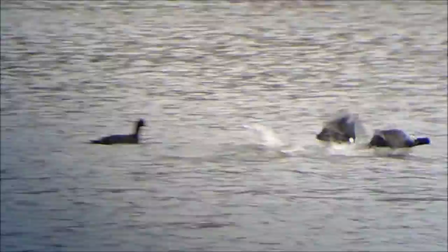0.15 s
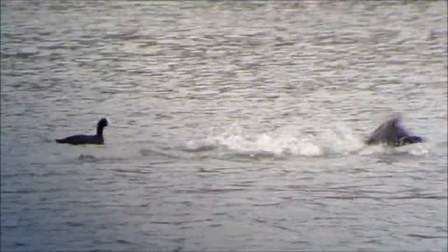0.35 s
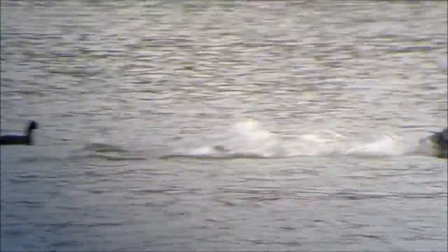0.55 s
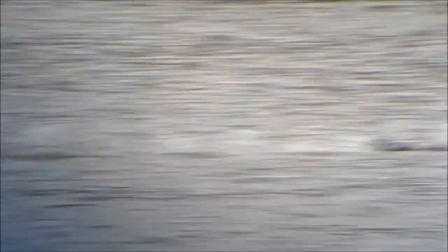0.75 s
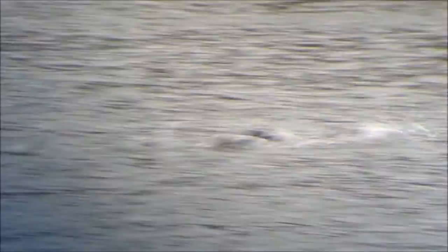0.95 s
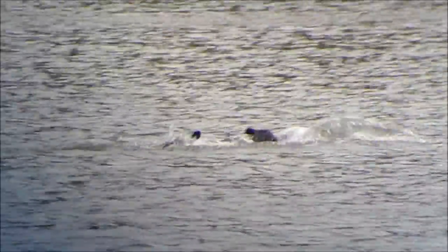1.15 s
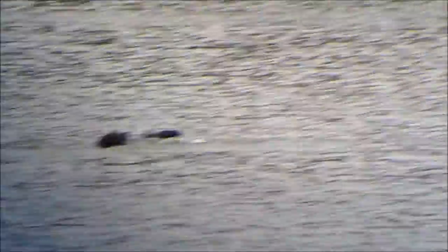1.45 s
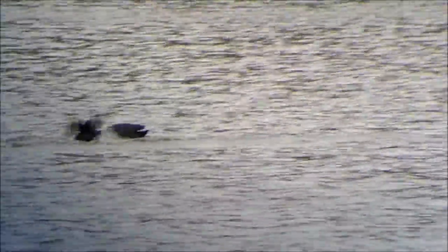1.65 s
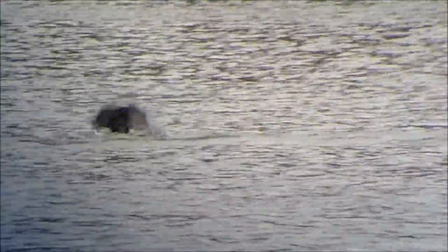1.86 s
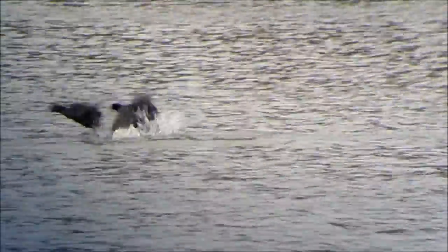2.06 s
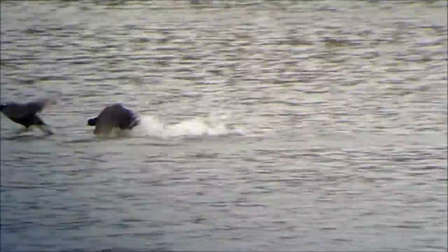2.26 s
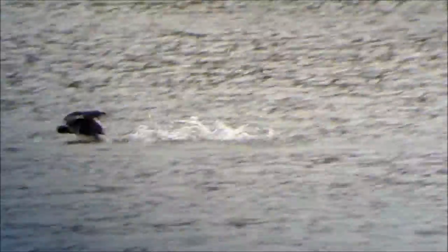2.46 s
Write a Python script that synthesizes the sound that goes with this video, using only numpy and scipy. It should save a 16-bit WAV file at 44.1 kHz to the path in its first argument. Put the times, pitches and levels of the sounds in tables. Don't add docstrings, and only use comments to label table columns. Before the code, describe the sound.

Short nasal coot squawks carry from far out on a wide reservoir, with one thin small-bird chirp, followed by soft foot slaps and faint splashing; low wind rumble, water wash and light camera hiss throughout.

```python
import sys
import numpy as np
from scipy import signal
from scipy.io import wavfile
from scipy.ndimage import uniform_filter1d

SR = 44100
rng = np.random.default_rng(int(sys.argv[2]) if len(sys.argv) > 2 else 0)


def voltage_ratio(level):
    return 10 ** (np.asarray(level, float) / 20)


def unload_audio(sound):
    columns = np.transpose(np.atleast_2d(sound))
    steps = np.round(np.clip(columns, -1, 1) * 32767)
    wavfile.write(sys.argv[1], SR, steps.astype(np.int16))


N = 115101

# (start [s], length [s], first pitch [Hz], last pitch [Hz], level [dB])
MELLOW_CALLS = [
    (.264, .096, 1062, 897, -44),
    (1.206, .05, 1078, 1030, -43),
]
CLEAR_CALLS = [
    (.852, .052, 895, 826, -37),
    (1.163, .054, 900, 770, -41),
    (2.33, .068, 930, 825, -45),
]
HARSH_CALLS = [
    (.263, .009, 1190, 1185, -36),
    (.272, .076, 1172, 1105, -31.5),
]
HOARSE_CALLS = [
    (.316, .032, 1035, 1032, -50),
    (.362, .04, 1042, 1034, -52),
    (1.225, .07, 1035, 1065, -52),
    (2.286, .075, 1075, 1030, -45),
]
# (start [s], length [s], first pitch [Hz], last pitch [Hz], level [dB])
YIPS = [
    (.248, .009, 995, 1010, -41),
    (.257, .012, 985, 1130, -43),
    (.832, .008, 1090, 1050, -44),
    (.841, .012, 925, 1025, -38),
]

# (frequency [Hz], level [dB])
MELLOW_THROAT = [(900, -.5), (1060, 0), (1800, -1), (2100, -2), (2750, -15), (3000, -3), (3200, -2),
                 (3800, -28)]
CLEAR_THROAT = [(850, -9), (1600, -.5), (1800, -.3), (2350, -1), (2650, -4), (3200, -11), (3550, -13),
                (4200, -30)]
HARSH_THROAT = [(1075, -1), (1150, -14), (2080, -4), (2200, -6), (2340, -.3), (3500, -.4), (4200, -32),
                (4700, -27)]
YIP_THROAT = [(1000, -10), (2000, -.1), (2300, -.3), (2950, -11), (3400, -12), (3800, -14), (4050, -26),
              (4800, -32)]

MELLOW_VOICE = dict(rise_s=.007, fade_db=-3, dull_db=-4, bend=2.7, hold=2, rough=.12, flutter_db=2.5)
CLEAR_VOICE = dict(rise_s=.004, fade_db=-8, dull_db=-7, bend=1.1, hold=1, rough=.1, flutter_db=1.5)
HARSH_VOICE = dict(rise_s=.004, fade_db=-25, dull_db=2, bend=2.5, hold=1, rough=.33, flutter_db=2)
YIP_VOICE = dict(rise_s=.002, fade_db=0, dull_db=0, bend=.5, hold=1, rough=.1, flutter_db=1)
HOARSE_VOICE = dict(rise_s=.007, fade_db=-4, dull_db=0, bend=3.5, hold=1, rough=.33, flutter_db=1.5)
FLUTTER_HZ, BREATH_HZ = 160, 130

# (start [s], length [s], first pitch [Hz], last pitch [Hz], level [dB])
CHIRP = [
    (1.016, .05, 3150, 4080, -59),
]
# (time [s], pitch [Hz], length [s], peak level [dB])
PLOPS = [(1.615, 2000, .014, -52), (1.668, 1620, .03, -47), (1.70, 1550, .016, -48),
         (1.795, 1340, .04, -47), (1.89, 1550, .008, -42), (1.891, 3550, .006, -49),
         (1.94, 1000, .014, -44), (2.088, 1560, .03, -46), (2.135, 2600, .014, -46),
         (2.143, 1550, .02, -49), (2.178, 3500, .008, -55), (2.498, 1150, .016, -47),
         (2.538, 560, .018, -40)]
# (middle [s], length [s], level [dB])
SPLASHES = [
    (0.833, 0.077, -46.5),
    (1.616, 0.36, -58),
    (1.93, 0.073, -61),
    (2.163, 0.093, -62),
    (2.545, 0.32, -54.5),
    (2.345, 0.14, -63.5),
]
# (frequency [Hz], level [dB])
SPRAY = [(600, -18), (1100, -3), (1600, 0), (2500, -7), (3200, -10), (3800, -20), (4500, -32)]
SPRAY_BUBBLES_PER_S = 2500

# (frequency [Hz], level per Hz [dB])
AIR = [(18, -39.5), (50, -12), (95, -5), (120, -1.5), (200, -3.5), (320, -7.5), (600, -9.5), (1600, -45.5)]
WATER = [(400, -13), (850, 2.5), (1300, -1), (2000, -5), (2800, -8), (3350, -9.5), (3800, -16.5),
         (4600, -53.5)]
HISS = [(2500, -16), (3900, 6), (5000, 4), (7000, 4.3), (7450, 5), (7800, -11.5), (8150, -37.5),
        (8400, -55)]
AIR_DB, WATER_DB, HISS_DB = -44.5, -51, -67
# (frequency [Hz], level [dB])
WHINE = [(4388, -85.5), (6223, -89.5)]
SHORE_T60_S, SHORE_DB = .2, -13
MICROPHONE_OFFSET = .0015


def evened(x):
    return x / np.sqrt(np.mean(x ** 2) + 1e-20)


def read(points, hz):
    f, value = np.transpose(points)
    return np.interp(np.log(hz + 1), np.log(f + 1), value)


def add(mix, s, sound):
    part = mix[round(s * SR):][:len(sound)]
    part += sound[:len(part)]


def drift(rate_hz, count):
    t = np.arange(count) / SR
    hz = np.geomspace(rate_hz / 8, rate_hz, 12)[:, None]
    phase = rng.random((12, 1))
    return np.sin(2 * np.pi * (hz * t + phase)).sum(0) / np.sqrt(6)


def call(row, throat, rise_s, fade_db, dull_db, bend, hold, rough, flutter_db):
    start, length, first_hz, last_hz, level_db = row
    t = np.arange(5000) / SR
    u = np.minimum(t / length, 1)
    glide = (1 - np.exp(-(bend * u) ** hold)) / (1 - np.exp(-bend ** hold))
    turns = np.cumsum(first_hz + (last_hz - first_hz) * glide) / SR
    hz = first_hz + (last_hz - first_hz) * glide
    out = np.zeros(len(t))
    for k in range(1, 5):
        smear = drift(BREATH_HZ * k, len(t)) + 1j * drift(BREATH_HZ * k, len(t))
        overtone = ((1 - rough + rough * smear) * np.exp(2j * np.pi * k * turns)).real
        dulling = dull_db * max(k - 2, 0) * 2 * np.sqrt(u)
        flutter = flutter_db * drift(FLUTTER_HZ, len(t))
        out += voltage_ratio(read(throat, k * hz) + dulling + flutter) * overtone
    edges = np.clip(np.minimum(t / rise_s, (length - t) / (2 * rise_s)), 0, 1)
    envelope = np.sin(np.pi / 2 * edges) ** 2 * voltage_ratio(level_db + fade_db * np.sqrt(u))
    return start, envelope * out


def coots():
    birds = [(MELLOW_CALLS, MELLOW_THROAT, MELLOW_VOICE),
             (CLEAR_CALLS, CLEAR_THROAT, CLEAR_VOICE),
             (HARSH_CALLS, HARSH_THROAT, HARSH_VOICE),
             (YIPS, YIP_THROAT, YIP_VOICE),
             (HOARSE_CALLS, HARSH_THROAT, HOARSE_VOICE)]
    out = np.zeros(N)
    for rows, throat, voice in birds:
        for row in rows:
            add(out, *call(row, throat, **voice))
    return out


def chirp():
    start, length, first_hz, last_hz, level_db = CHIRP[0]
    out = np.zeros(N)
    u = np.arange(0, length, 1 / SR) / length
    hz = last_hz + (first_hz - last_hz) * np.exp(-4.5 * u)
    whistle = np.sin(2 * np.pi * np.cumsum(hz) / SR)
    add(out, start, voltage_ratio(level_db) * np.sin(np.pi * u ** 0.38) * whistle)
    return out


def plops():
    out = np.zeros(N)
    t = np.arange(2500) / SR
    for s, hz, length, peak_db in PLOPS:
        turns = np.cumsum(hz * (1 + .03 * drift(300, len(t)))) / SR
        shape = np.sin(np.pi * np.minimum(t / length, 1) ** .6)
        add(out, s, voltage_ratio(peak_db) * shape * np.sin(2 * np.pi * turns))
    return out


def spray():
    t, out = np.arange(N) / SR, np.zeros(N)
    u = np.linspace(0, 1, 300)
    bursting = rng.random(N) < SPRAY_BUBBLES_PER_S / SR
    size = voltage_ratio(1.9 * np.minimum(rng.exponential(1, N), 4)) * bursting
    kind = rng.integers(0, 24, N)
    for k, hz in enumerate(np.geomspace(700, 4500, 24)):
        ring = np.sin(2 * np.pi * hz * 300 / SR * u * (1 + .05 * u))
        bubble = ring * np.sin(np.pi * u) ** 2
        out += voltage_ratio(read(SPRAY, hz)) * signal.oaconvolve(size * (kind == k), bubble)[:N]
    churning = sum(voltage_ratio(db) * np.exp(-(2 * (t - s) / length) ** 2) for s, length, db in SPLASHES)
    return evened(out) * churning


def shore(x):
    t = np.arange(0, .3, 1 / SR)
    taps = np.zeros(round(.3 * SR) + 20)
    at = np.arange(200, len(t), 20)
    echoes = rng.choice([-1., 1.], len(at)) * voltage_ratio(-60 * t[at] / SHORE_T60_S)
    taps[at + rng.integers(0, 20, len(at))] = echoes
    return voltage_ratio(SHORE_DB) * signal.fftconvolve(x, taps / np.linalg.norm(taps))[:N]


def wash(colour, level_db, patchy_db, swell_db):
    frames, hz = N // 256 + 5, np.fft.rfftfreq(1024, 1 / SR)
    a, b, patches = rng.standard_normal((frames, 513, 3)).T
    patches = uniform_filter1d(patches, 10, 0)
    patches = evened(uniform_filter1d(patches, 12, 1))
    swell = drift(5.6, count=frames * 256)[::256]
    z = (a + 1j * b) * voltage_ratio(read(colour, hz)[:, None] + patchy_db * patches + swell_db * swell)
    noise = signal.istft(z, nperseg=1024, noverlap=768)[1][:N]
    return voltage_ratio(level_db) * evened(noise)


def lapping_water():
    return wash(WATER, WATER_DB, patchy_db=1., swell_db=.3)


def wind():
    return wash(AIR, AIR_DB, patchy_db=.6, swell_db=.3)


def microphone_hiss():
    return wash(HISS, HISS_DB, patchy_db=.2, swell_db=.1)


def camera_whine():
    t = np.arange(N) / SR
    return sum(np.sqrt(2) * voltage_ratio(db) * np.sin(2 * np.pi * hz * t) for hz, db in WHINE)


def scene():
    far = coots() + chirp() + plops()
    return (far + shore(far) + spray() + lapping_water() + wind())[None]


def band_limit(x):
    return signal.sosfilt(signal.butter(12, 8160, fs=SR, output="sos"), x)


def record(dry):
    mix = dry + microphone_hiss() + camera_whine() + MICROPHONE_OFFSET
    return band_limit(mix)


dry = scene()
out = record(dry)
unload_audio(out)
```